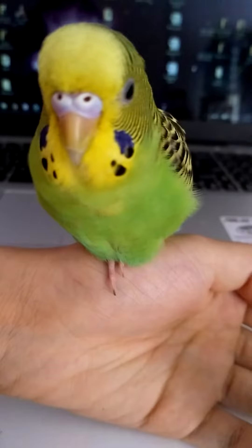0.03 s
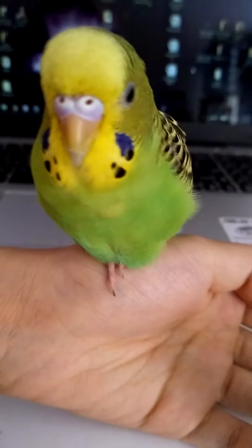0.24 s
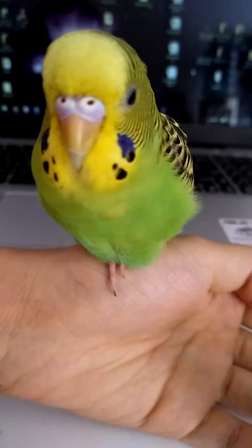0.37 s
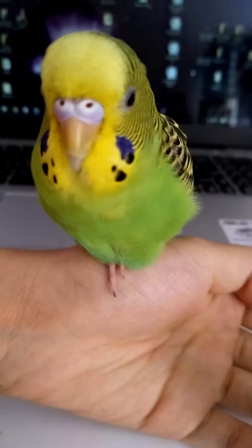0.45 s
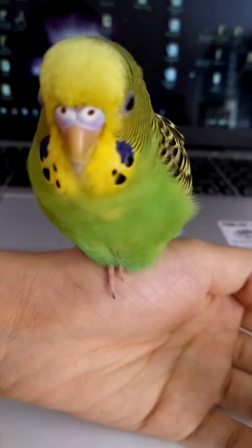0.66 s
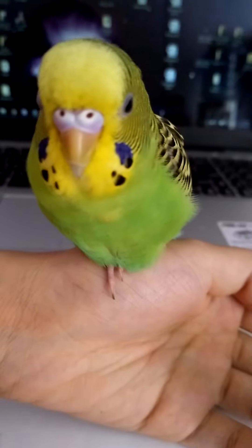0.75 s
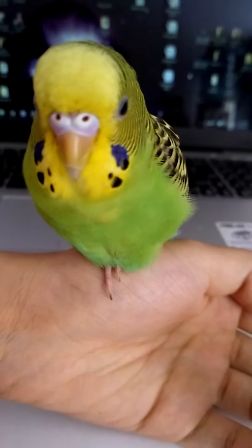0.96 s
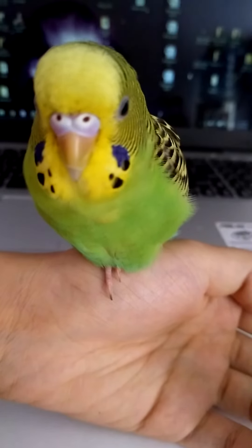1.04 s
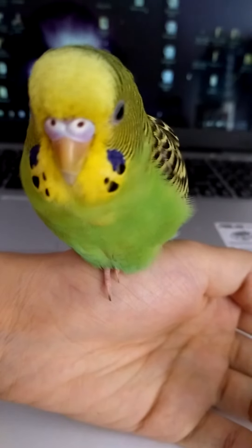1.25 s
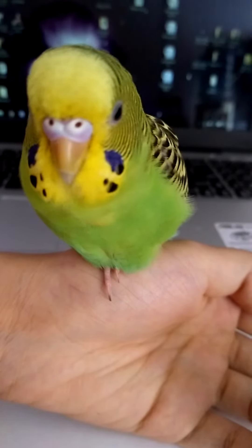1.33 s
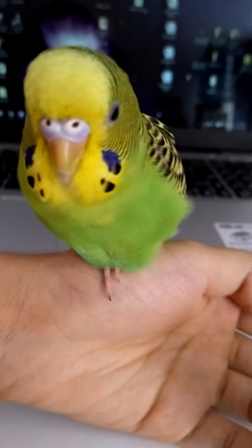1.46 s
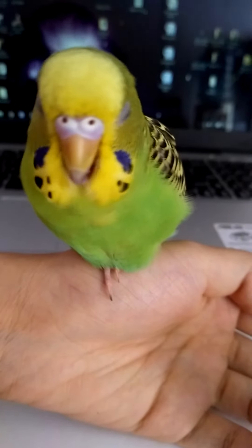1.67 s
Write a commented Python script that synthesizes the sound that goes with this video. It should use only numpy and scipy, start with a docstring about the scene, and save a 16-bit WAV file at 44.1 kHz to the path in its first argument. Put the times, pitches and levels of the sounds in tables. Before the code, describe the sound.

A budgie chatters softly close to the microphone in a small room. Tiny squeaks come first, then a sharp snap, a stuttering buzz that breaks into a whistle, short clucks and a rasp, over faint hum and hiss.

```python
"""A few tiny squeaks come first, as a budgie chatters softly close to the microphone in a small room.
Then come a sharp snap, a buzz that stutters and breaks into a whistle, short clucks and a rasp.
The voice is a train of quick pulses and puffs of air that ring in the throat and beak.
The beak ticks in between. Faint scuffs, a low hum, a soft rustle and hiss lie underneath."""
import sys
import numpy as np
from scipy import signal
from scipy.fft import rfft, irfft
from scipy.io import wavfile
from scipy.ndimage import uniform_filter1d

SR = 44100
rng = np.random.default_rng(int(sys.argv[2]) if len(sys.argv) > 2 else 0)


def master(y):
    """Save y as 16-bit WAV."""
    cut = np.clip(np.atleast_2d(y).T, -1, 1)
    pcm = np.round(cut * 32767)  # scale
    wavfile.write(sys.argv[1], SR, pcm.astype(np.int16))


N = 74970
CUTOFF_HZ = 14700  # top of the voice's overtones and of the recorder's range


def syrinx(hz, rough, jitter):
    """The bird's voice box: wavering pulses and a puff of air per cycle. Roughness 1 is all air."""
    wobble, flutter, air = rng.standard_normal((3, SR // 4))
    wobble, flutter = (unit(uniform_filter1d(v, SR // 700))[:len(hz)] for v in (wobble, flutter))
    cycles = np.cumsum(hz * np.exp(jitter * wobble)) / SR - .5  # jitter: how much the pitch wavers
    overtones = sum(np.cos(2 * np.pi * k * cycles) for k in range(2, int(CUTOFF_HZ / np.mean(hz)) + 1))
    shimmer = np.exp(min(12 * jitter, .3) * flutter)  # the overtones flutter in strength
    pulses = np.cos(2 * np.pi * cycles) + overtones * shimmer
    puffs = np.exp(-(cycles % 1) / .33) * air[:len(hz)]  # each fades over a third of a cycle
    rough = np.clip(rough, 0, 1)
    return np.sqrt(1 - rough) * unit(pulses) + np.sqrt(rough) * unit(puffs)


# Pitches at which the throat rings: f/Hz, width/Hz
THROAT_RINGS = [(1150, 250), (2700, 800), (3600, 270), (5900, 2300), (7700, 1800)]
def throat(x, colour, bass_db=0, treble_db=0, size=4096):
    """The throat rings briefly and gives a sound its colour: which frequencies are strong or weak."""
    hz = np.fft.rfftfreq(size, 1 / SR)
    octaves_below = np.clip(np.log2(colour[0][0] / (hz + 1)), 0, 1.5)
    db = read(colour, hz) - 40 * octaves_below
    db += read([(1200, bass_db), (2200, .015), (4000, .0049), (5800, treble_db)], hz)
    log_gain = np.log(amp(np.r_[db, db[-2:0:-1]]))
    response = np.fft.ifft(np.exp(np.conj(signal.hilbert(log_gain)))).real  # a click in this colour
    y = signal.fftconvolve(x, response[:size // 4])
    for ring_hz, width in THROAT_RINGS:
        r = np.exp(-np.pi * width / SR)
        poles = [1, -2 * r * np.cos(2 * np.pi * ring_hz / SR), r * r]
        y = signal.lfilter(poles[::-1], poles, y)  # this pitch lingers but gets no louder
    return match_energy(y, x)


def burst(length, db, hz, rough, jitter=.12, rise=0, attack_s=.0019, release_s=.00061):
    """A few milliseconds of voice; the pitch climbs by the share `rise`."""
    t = np.arange(0, length, 1 / SR)
    shape = np.minimum(t / attack_s, 1) * np.minimum((length - t) / release_s, 1)
    pitch = hz * (1 + rise * (t / length - .5))
    return amp(db) * unit(shape * syrinx(pitch, rough, jitter))


def note(curve, colour, jitter, throb_db=0, throb_hz=170):
    """A held note that follows its curve and may throb unevenly. Gives its start time and sound."""
    times, *columns = np.transpose(curve)
    t = np.arange(times[0], times[-1], 1 / SR)
    hz, db, rough = (np.interp(t, times, column) for column in columns)
    sway = unit(uniform_filter1d(rng.standard_normal(len(t)), SR // throb_hz))
    throb_phase = 2 * np.pi * np.cumsum(throb_hz * (1 + .5 * sway)) / SR
    throb = unit(amp(throb_db * np.cos(throb_phase)))
    return times[0], throat(amp(db) * throb * syrinx(hz, rough, jitter), colour)


# One loud burst of voice: length/s, level/dB, f/Hz, roughness/0-1
SNAP = (.0056, -22.5, 1153, 0.63)
# Its colour: f/Hz, level/dB
SNAP_COLOUR = [(700, -26), (1100, -13), (1600, -22.5), (2700, -7), (3400, 0), (4500, -9.5), (5800, -3.5),
               (6700, -19.5), (7700, -12.5), (9600, -18.5), (11000, -34.5)]
def snap(out):
    """A burst of voice so short and bright that it sounds like a snap."""
    add(out, .22, throat(burst(*SNAP, jitter=.075), SNAP_COLOUR))


# How each held note moves: t/s, f/Hz, level/dB, roughness/0-1
BUZZ = [(.4485, 611.5, -37, 0.29), (.468, 593.8, -42.5, 0.07), (.486, 601.3, -37, 0),
        (.505, 612.4, -38.5, 0.3), (.508, 614, -33.5, 0.4)]
WHISTLE = [(.541, 1604, -40.5, 0.45), (.549, 1522, -33, .2), (.562, 1519, -33, 0.047),
           (.57, 1455, -30, 0.062), (.578, 1503, -34, 0.042), (.585, 1495, -38, 0.058),
           (.593, 1378, -30.5, .15), (.602, 1446, -36, 0.59), (.61, 1510, -77.5, .45)]
RASP = [(1.05, 632.6, -48, .3), (1.074, 677.6, -41.5, 0.37), (1.097, 640.4, -44.5, 0.32),
        (1.11, 617, -54.5, 0.36)]
# Their colours: f/Hz, level/dB
BUZZ_COLOUR = [(605, -7.5), (1210, 1.5), (1815, -3.5), (2420, -2.5), (3025, -4), (3630, -12.5),
               (4235, -16.5), (4840, -23), (6050, -22.5), (6600, -14), (7900, -20.5), (12000, -46.5)]
WHISTLE_COLOUR = [(1500, -1.5), (2100, -15), (3000, -12), (4500, -18), (6000, -25.5), (7500, -15),
                  (8800, -26), (11000, -41.5)]
RASP_COLOUR = [(450, -7), (700, 0), (1600, -1), (2400, -2), (3400, 1), (4800, -14), (5500, -14.5),
               (7800, -21.5), (14000, -52)]
def held_notes(out):
    """Steady pulses buzz, faster ones whistle, and irregular ones in uneven clumps rasp."""
    add(out, *note(BUZZ, BUZZ_COLOUR, jitter=.013))
    add(out, *note(WHISTLE, WHISTLE_COLOUR, jitter=.016))
    add(out, *note(RASP, RASP_COLOUR, jitter=.3, throb_db=3.5))


# One cluck a row: t/s, length/s, level/dB, f/Hz, roughness/0-1, bass/dB, treble/dB
CLUCKS = [(0.8434, 0.012, -33.5, 957.2, 0.6, -1, -1.5), (0.856, 0.016, -42, 1143, 1.02, -0.5, -7),
          (1.3056, 0.0061, -31.5, 719, 0.11, -1, -3), (1.3204, 0.011, -49.5, 1198, 0.83, 3, 2.5),
          (1.3742, 0.00862, -29, 721, 0.8, -6, 1), (1.403, 0.0036, -35, 904, 0.46, -12, 3.5),
          (1.4327, 0.0066, -34.5, 899, 0, -4.5, -4), (1.441, 0.0036, -33, 843, 0.13, -1, 0.5)]
# Their colour: f/Hz, level/dB
CLUCK_COLOUR = [(450, -15.5), (700, -3.5), (1100, 2), (1600, -4.5), (2400, 1.5), (3100, -2.5), (4100, -3),
                (4700, -7.5), (5800, -4.5), (6500, -10), (7700, -7), (9500, -24), (14000, -33.5)]
def clucks(out):
    """Each cluck is a few voice pulses that speed up while the beak opens."""
    for start, length, db, hz, rough, bass_db, treble_db in CLUCKS:
        voice = throat(burst(length, db, hz, rough, rise=.4), CLUCK_COLOUR, bass_db, treble_db)
        add(out, start, opening_beak(voice, length))


def opening_beak(x, length, shut_hz=2630, open_hz=4320, width_hz=160, lag_s=.0043, ring_db=-5):
    """As the beak opens, one ringing pitch slides upward and rings on."""
    hz = np.interp(np.arange(len(x)) / SR, [0, length + lag_s], [shut_hz, open_hz])
    sweep = np.exp(2j * np.pi * np.cumsum(hz) / SR)
    r = np.exp(-np.pi * width_hz / SR)
    ring = 2 * (sweep * signal.lfilter([1 - r], [1, -r], x / sweep)).real
    return match_energy(x + amp(ring_db) * ring, x)


# One squeak a row: t/s, length/s, level/dB, f/Hz, roughness/0-1
SQUEAKS = [(0., 0.0067, -39.5, 1928, 0.24), (.006, 0.017, -47, 1920, 0.45),
           (0.021, 0.025, -48.5, 2215, 0.3), (0.047, .007, -44, 1850, 0.02),
           (0.53, 0.014, -48.5, 3203, 0.54), (.603, 0.0062, -47, 3046, 0.54)]
# Their colour: f/Hz, level/dB
SQUEAK_COLOUR = [(1000, -2.5), (1900, 0.5), (3000, 3), (4300, -7.5), (7800, -8), (14000, -48)]
def squeaks(out):
    """Tiny bursts of very fast pulses make high squeaks."""
    for start, length, db, hz, rough in SQUEAKS:
        add(out, start, throat(burst(length, db, hz, rough, jitter=.071), SQUEAK_COLOUR))


# Lone blips of voice: t/s, level/dB
STUTTER = [(.5102, -39), (0.5155, -34), (.5212, -36.5)]
def stutter(out):
    """At the end of the buzz the voice slows to a stutter."""
    for start, db in STUTTER:
        blip = burst(length=.0043, db=db, hz=675, rough=.35)
        add(out, start, throat(blip, BUZZ_COLOUR, treble_db=-3))


# Beak ticks, and dry creaks that open and close the rasp: t/s, level/dB
TICKS = [(0.031, -50), (0.046, -44), (1.4347, -36.5), (1.5865, -52), (1.6112, -43)]
CREAKS = [(1.0375, -44), (1.0422, -41), (1.0445, -40), (1.1005, -37), (1.108, -37), (1.1183, -40),
          (1.1278, -43)]
# Colour of the ticks: f/Hz, level/dB
TICK_COLOUR = [(1000, -25.5), (6000, -6), (7700, -2), (9500, -12), (14000, -19)]
def ticks_and_creaks(out, fade_s=.0017):
    """The beak ticks and the voice creaks: each is a pinch of noise that dies away at once."""
    t = np.arange(SR // 80) / SR
    for events, colour in ((TICKS, TICK_COLOUR), (CREAKS, RASP_COLOUR)):
        for start, db in events:
            click = amp(db) * np.exp(-t / fade_s) * rng.standard_normal(len(t))
            add(out, start, throat(click, colour))


# Faint scuffs and mutters: t/s, length/s, level/dB, f/Hz, width/octaves
SCUFFS = [(0.332, 0.098, -66, 4540, 0.55), (0.684, 0.083, -67.5, 404, 0.33),
          (1.184, 0.028, -66.5, 555, 0.058), (1.246, 0.024, -62.5, 850, 0.93)]
def scuffs(out):
    """Soft swells of narrow noise between the calls."""
    for start, length, db, centre_hz, width in SCUFFS:
        n = int(length * SR)
        octaves_away = np.log2((np.fft.rfftfreq(n, 1 / SR) + 1) / centre_hz)
        band = np.exp(-.5 * (octaves_away / width) ** 2)
        swish = irfft(rfft(rng.standard_normal(n)) * band, n)
        add(out, start, amp(db) * unit(np.hanning(n) ** .5 * swish))


# The microphone's two openings, left compared with right: f/Hz, level/dB, phase lead/rad
OPENINGS = [(550, 5, -.4), (900, -1.5, -0.39), (1437, -0.5, 0.2), (1835, 8, 0.36), (2425, -0.5, -1.34),
            (2630, -18, 0.17), (2780, 0, 1.1), (4400, 0.5, 0.38), (5050, 2, 1.6), (5300, 22, 0.069),
            (6800, 5, -0.054), (7820, -10, -1.6), (8150, -3.5, 1.5)]
def microphone(x, desk_s=.0027, desk_db=-29, right_lag_s=.000291):
    """The sound and its bounce off the desk reach the left opening first; each has its own colour."""
    hz = np.fft.rfftfreq(2 * N, 1 / SR)
    arriving = rfft(x, 2 * N) * (1 + amp(desk_db) * np.exp(-2j * np.pi * hz * desk_s))
    balance, lead = (read(np.array(OPENINGS)[:, [0, column]], hz) for column in (1, 2))
    sides = np.array([[.5], [-.5]])
    pair = amp(balance * sides) * np.exp(1j * lead * sides)
    pair /= np.sqrt(np.mean(abs(pair) ** 2, 0))
    delay = np.exp(-2j * np.pi * hz * np.array([[0], [right_lag_s]]))
    return irfft(arriving * pair * delay)[:, :N]


# How long the room's echo takes to fade by 60 dB: f/Hz, length/s
ROOM_FADE = [(500, .25), (1500, 0.32), (3000, 0.28), (14000, 0.4)]
def room(x, early_fade_s=.068, ring_hz=1466, ring_fade_s=.35):
    """Quick echoes and a short tail, unlike on each side, and one room tone that the whistle wakes."""
    hz, t, scatter = signal.stft(rng.standard_normal((2, 2, SR // 2)), SR, nperseg=256)
    scatter *= np.minimum(t / .0011, 1)
    fade_s = np.array([read(ROOM_FADE, hz), np.full(len(hz), early_fade_s)])
    fades = amp(-60 * t / fade_s[:, None, :, None])
    tails = signal.istft(scatter * fades, SR, nperseg=256)[1]
    late, early = tails / np.linalg.norm(tails, axis=2, keepdims=True)
    age = np.arange(late.shape[1]) / SR
    ring_fade = amp(-60 * age / ring_fade_s)
    ring = 2 * ring_fade / ring_fade.sum() * np.sin(2 * np.pi * ring_hz * age)
    echoes = amp(-15.5) * late + amp(-13) * early + amp(-11.5) * ring
    return signal.fftconvolve(x[None], echoes, axes=1)[:, :N]


# How alike the noise is on the left and right: f/Hz, likeness/0-1
LIKENESS = [(50, 0.97), (250, 0.92), (2000, 0.12)]
def noise(colour):
    """Coloured noise whose bass is nearly the same on both sides."""
    hz = np.fft.rfftfreq(N, 1 / SR)
    left, other = rfft(rng.standard_normal((2, N)))
    same = read(LIKENESS, hz)
    right = same * left + np.sqrt(1 - same ** 2) * other
    return unit(irfft(np.array([left, right]) * amp(read(colour, hz)), N))


# The hum's tones, then the colours of hiss and rustle: f/Hz, level/dB
HUM = [(58, -72), (193.8, -75.5), (242.2, -81)]
HISS_COLOUR = [(24, -36), (40, -0.5), (97, 1.5), (410, -13.5), (1070, -18.5), (4530, -28), (6390, -23),
               (14000, -32)]
RUSTLE_COLOUR = [(30, -20), (55, 3.5), (85, -11.5), (130, 0), (250, -14.5), (450, -9), (4000, -46.5)]
# How the rustle swells and fades: t/s, level/dB
RUSTLE = [(0, -72), (.41, -77.5), (.48, -67.5), (.85, -62), (.96, -72), (1.33, -67), (1.43, -61),
          (1.53, -74), (1.7, -78.5)]
def background():
    """A faint hum, steady hiss and a soft low rustle that comes and goes."""
    t = np.arange(N) / SR
    hum = sum(amp(db) * unit(np.sin(2 * np.pi * (hz * t + rng.random()))) for hz, db in HUM)
    hiss = amp(-67.5) * noise(HISS_COLOUR)
    rustle = amp(np.interp(t, *np.transpose(RUSTLE))) * noise(RUSTLE_COLOUR)
    return hum + hiss + rustle


def amp(db):
    """Turns decibels into a number to multiply by."""
    return 10 ** (np.asarray(db) / 20)


def unit(x):
    """Scales a sound to an average strength (rms) of 1."""
    return x / np.sqrt(np.mean(x ** 2) + 1e-20)


def match_energy(y, x):
    """Scales y to hold as much energy as x."""
    return y * np.sqrt(np.sum(x ** 2) / np.sum(y ** 2))


def read(points, hz):
    """Reads between a table's rows, with frequency spaced in octaves."""
    f, value = np.transpose(points)
    return np.interp(np.log(hz + 1), np.log(f + 1), value)


def add(mix, start, sound):
    """Mixes a sound in at `start` seconds."""
    part = mix[max(round(start * SR), 0):][:len(sound)]
    part += sound[:len(part)]


def scene():
    """The bird, its echo in the room and the background."""
    bird = np.zeros(N)
    for play in (snap, held_notes, clucks, squeaks, stutter, ticks_and_creaks, scuffs):
        play(bird)
    return microphone(bird) + room(bird) + background()


def record(dry):
    """The recorder cuts off the highest treble."""
    lowpass = signal.firwin(255, CUTOFF_HZ, window=("kaiser", 8), fs=SR)
    return signal.oaconvolve(dry, lowpass[None], "same", axes=1)


dry = scene()
out = record(dry)
master(out)
```